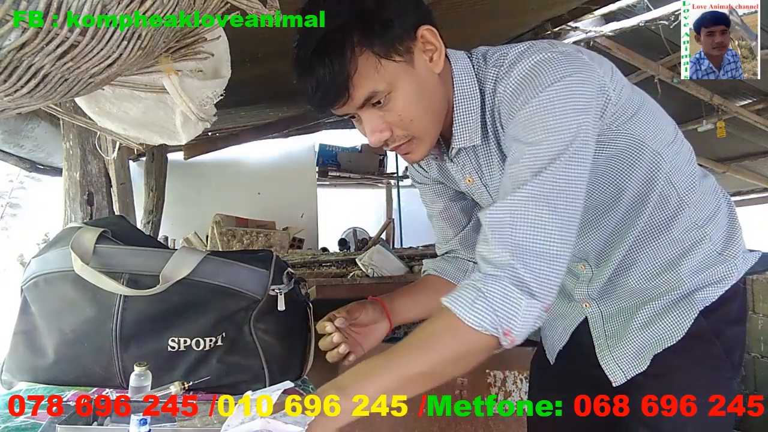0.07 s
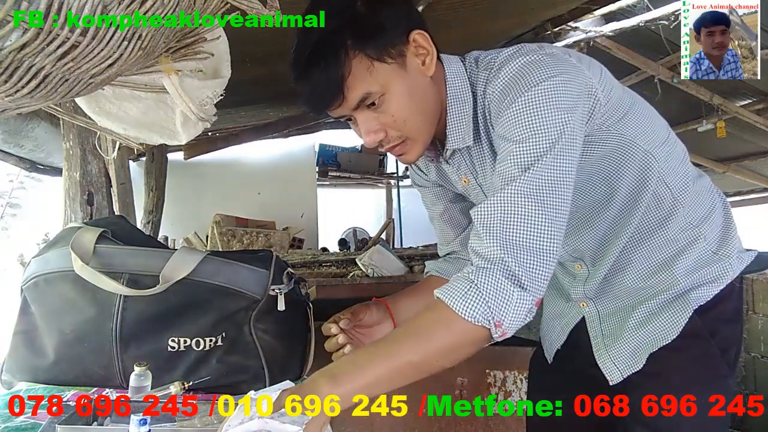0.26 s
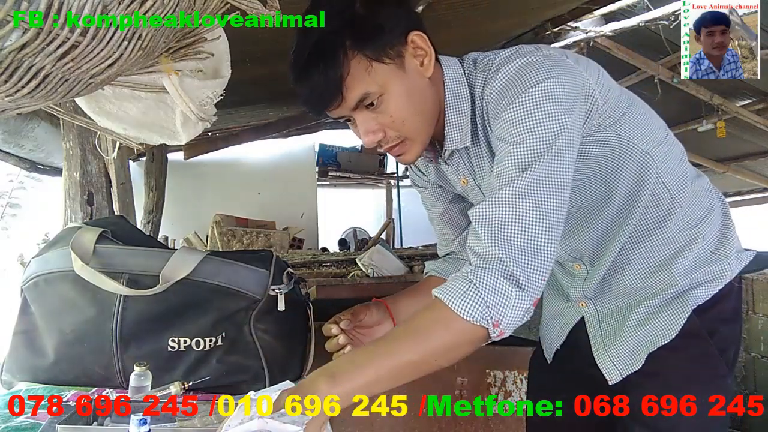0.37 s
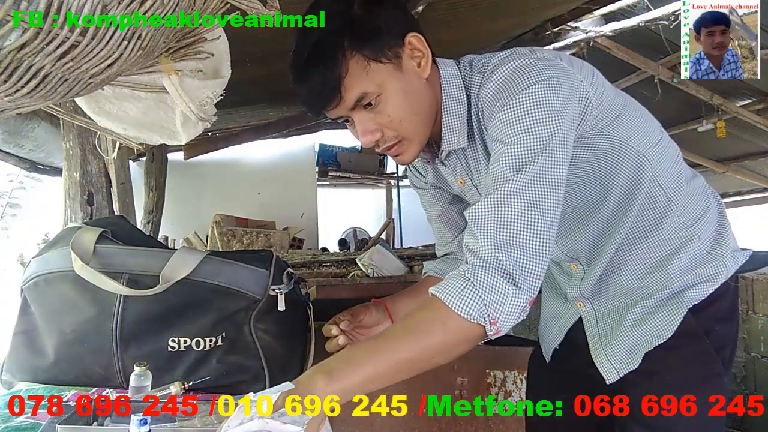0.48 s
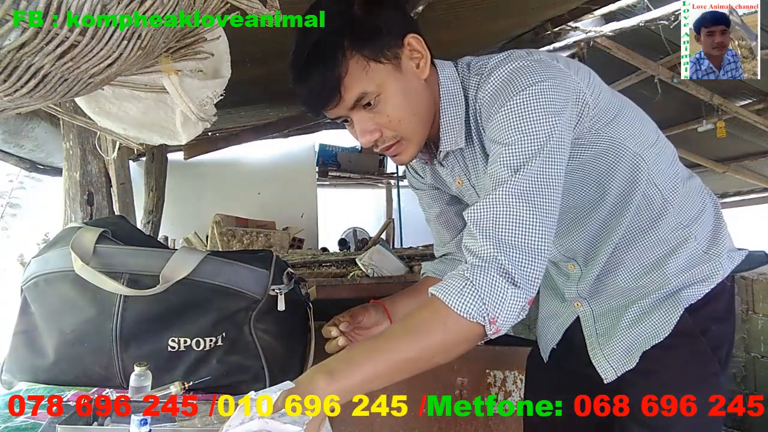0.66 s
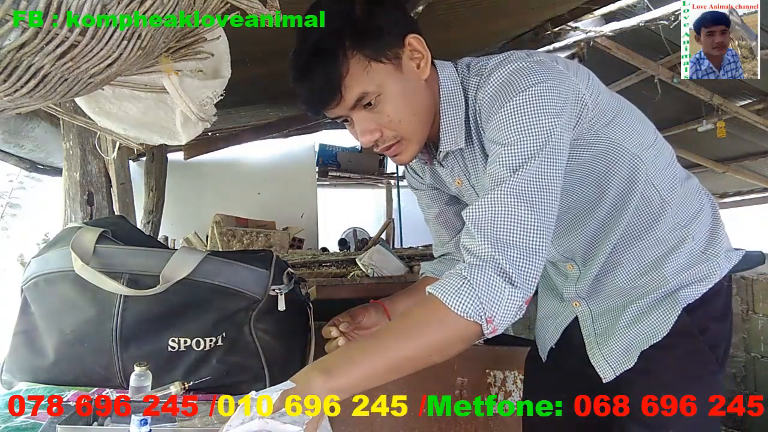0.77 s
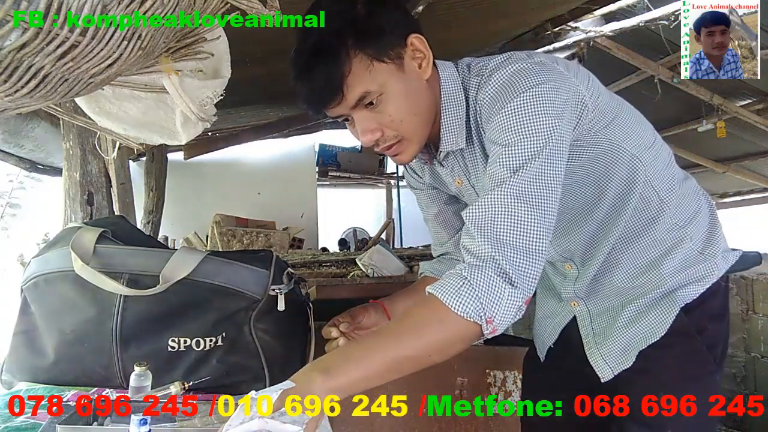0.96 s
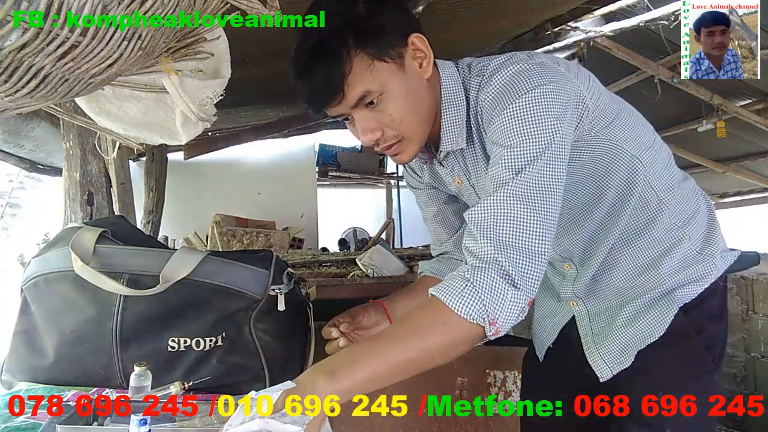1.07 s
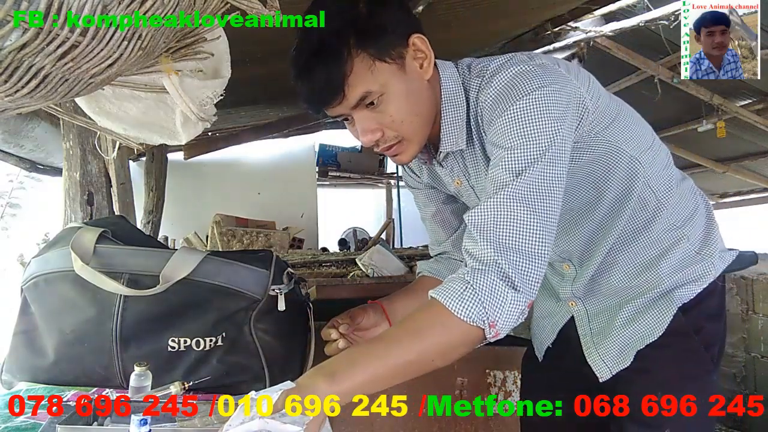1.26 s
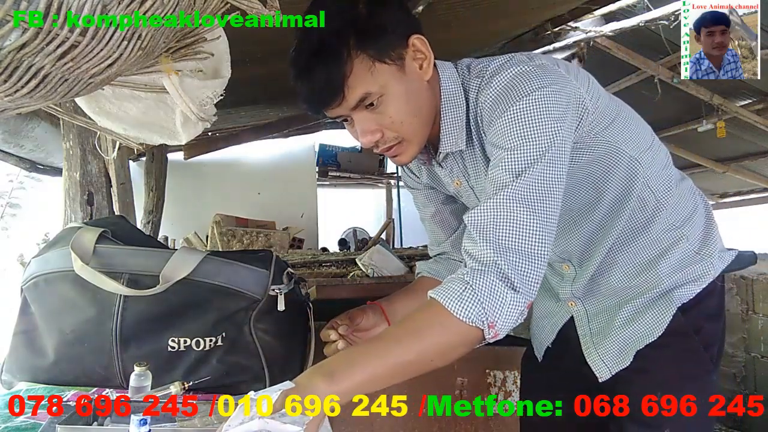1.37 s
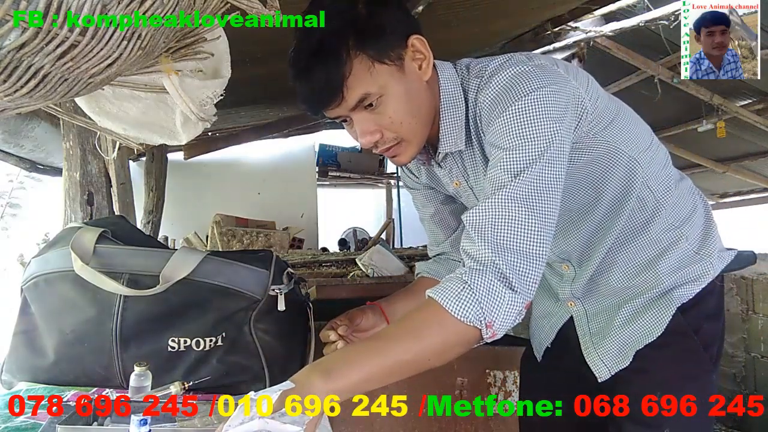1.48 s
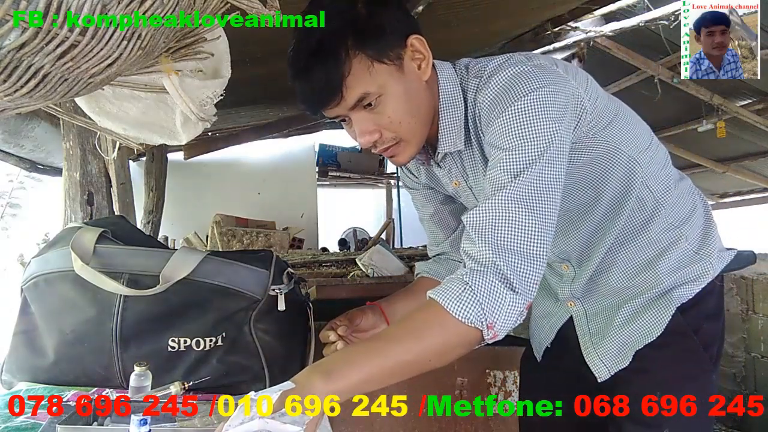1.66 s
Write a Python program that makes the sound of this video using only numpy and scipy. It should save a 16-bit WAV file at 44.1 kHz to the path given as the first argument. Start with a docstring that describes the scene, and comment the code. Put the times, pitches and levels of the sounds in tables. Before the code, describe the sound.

A pig close to the microphone creaks a slow grunt of separate throaty pops from about 0.15 to 0.4 seconds. From 0.45 to 1.5 another pig, further off, cries hoarsely in breathy, fluttering mid-pitched bursts, weaker midway and stronger again near 1.4. Small birds whistle and twitter throughout, with thin faint hisses near 1.05 and 1.35. A faint engine hum and yard air lie underneath, with short shed reverberation.

```python
"""A distant engine throbs under a far flock's twitter and faint wide yard air, in and around a pig shed.
Small birds chirp under the roof: short gliding whistles, slightly fuzzy; a few faint moans come from far off.
Close by, a pig creaks a slow grunt: flaps of the folds ring chest and mouth with puffs of air.
Another pig further off cries hoarsely again and again: a jittery, fluttering voice with rasp and breath.
Late on come two thin treble hisses; the shed answers the near and far pigs, birds and hisses."""
import sys
import numpy as np
from scipy import signal
from scipy.fft import rfft, irfft
from scipy.io import wavfile
from scipy.ndimage import uniform_filter1d

SR = 44100
rng = np.random.default_rng(int(sys.argv[2]) if len(sys.argv) > 2 else 0)


def master_out(mix):
    """Clip the mix to full scale and print it as 16-bit PCM to the path in sys.argv[1]."""
    frames = np.transpose(np.atleast_2d(mix))
    ceiling = np.clip(frames, -1, 1)
    pcm = np.round(ceiling * 32767).astype(np.int16)
    wavfile.write(sys.argv[1], SR, pcm)


def attenuation_scalar(level_db):
    """Turn a level in dB into a linear amplitude multiplier (20 dB per decade)."""
    decades = np.asarray(level_db, float) / 20
    return 10 ** decades


N = 77175
T = np.arange(N) / SR

# likeness of the left and right noise in the open air and in the shed's tail: hz, likeness (0-1)
LEFT_RIGHT_LIKENESS = [(60, 0.85), (300, 0.82), (1000, 0.12), (15000, 0.032)]


def evened(x):
    """Scales a sound to an rms of 1."""
    return x / np.sqrt(np.mean(x ** 2) + 1e-20)


def read(points, hz):
    """Reads a (Hz, value) curve along a logarithmic frequency axis."""
    f, value = np.transpose(points)
    return np.interp(np.log(hz + 1), np.log(f + 1), value)


def add(mix, start_s, sound):
    """Lays a sound into the mix at its start time, cut off at the end of the mix."""
    part = mix[..., round(start_s * SR):][..., :sound.shape[-1]]
    part += sound[..., :part.shape[-1]]


def coloured(x, spectrum):
    """Weights the spectrum by a (Hz, dB) curve."""
    weight = attenuation_scalar(read(spectrum, np.fft.rfftfreq(x.shape[-1], 1 / SR)))
    return irfft(rfft(x) * weight, x.shape[-1])


def slow(size):
    """Random drift of rms 1: noise averaged twice over size samples."""
    return evened(uniform_filter1d(uniform_filter1d(rng.standard_normal(N), size), size))


def resonate(x, hz, width_hz):
    """Shifts the curve hz down to zero, smooths, and shifts back: a resonance of gain 1."""
    turn = np.exp(2j * np.pi * np.cumsum(hz * np.ones(len(x))) / SR)
    r = np.exp(-np.pi * width_hz / SR)
    return 2 * (turn * signal.lfilter([1 - r], [1, -r], x / turn + 1e-18)).real


def narrow_band(noise, hz, width_hz):
    """Noise passed twice through one resonance, evened; the width is that of each pass."""
    return evened(resonate(resonate(noise, hz, width_hz), hz, width_hz))


def rung(noise, bands):
    """One noise ringing several resonances: hz, width_hz, level_db."""
    return sum(attenuation_scalar(db) * narrow_band(noise, hz, width_hz) for hz, width_hz, db in bands)


def likened(a, b, hz):
    """Mixes b with a so that the two channels are as alike as the table says at each frequency."""
    same = np.clip(read(LEFT_RIGHT_LIKENESS, hz), 0, 1).reshape(-1, *[1] * (a.ndim - 1))
    return same * a + np.sqrt(1 - same ** 2) * b


def placed(x, left_lag, wet_db):
    """Direct sound, its left port lagging by samples; the shed answers with sparse taps dying by band."""
    # time for the shed's tail to fall 60 dB: hz, t60_s
    shed_decay = [(100, 0.62), (600, 0.35), (2000, 0.3), (6000, 0.36), (14000, 0.032)]
    taps = np.zeros((2, SR // 2))
    tap_count = (SR // 2 - 201) // 20
    at = np.arange(200, SR // 2 - 20, 20) + rng.integers(0, 20, (2, tap_count))
    np.put_along_axis(taps, at, rng.choice([-1., 1.], at.shape), 1)
    hz, t, z = signal.stft(taps, SR, nperseg=512)
    z[1] = likened(z[0], z[1], hz)
    decay = attenuation_scalar(-60 * t / read(shed_decay, hz)[:, None])
    tail = signal.istft(z * decay, SR, nperseg=512)[1]
    x = x * np.ones((2, 1))
    wet = signal.fftconvolve(x.mean(0)[None], tail / np.linalg.norm(tail[0]), axes=1)[:, :N]
    return np.array([np.roll(x[0], left_lag), x[1]]) + attenuation_scalar(wet_db) * wet


def engine():
    """Low orders of the firing rate, each wavering a little in level."""
    # orders of the firing rate: order, level_db, phase_rad
    orders = [(3, -73, 0.1), (4, -63.5, 0.043), (5, -54, 0.089), (6, -60, 0.042), (7, -64, 0.24),
              (9, -79, 0.1), (10, -73.5, 0.045)]
    firing_hz, firing_s, wobble_db = 18.2, 0.0067, 1.0
    turn = 2 * np.pi * firing_hz * (T - firing_s)
    return sum(attenuation_scalar(db + wobble_db * slow(size=2500)) * np.cos(order * turn + phase)
               for order, db, phase in orders)


def flock():
    """Far twittering smeared into narrow flickering bands, drawn separately for left and right."""
    # loudness of the far flock: time_s, level_db
    twitter_level = [(0, -61), (.03, -61.5), (.05, -57), (.12, -64.5), (.2, -57), (.4, -59.5), (1.0, -58.5),
                     (1.3, -93), (1.4, -77), (1.6, -95), (1.65, -61.5), (1.75, -87)]
    # where the twitter gathers: hz, width_hz, level_db
    twitter_bands = [(3100, 290, -6), (4200, 200, -11.5), (5800, 760, -19)]

    def one_side():
        return sum(attenuation_scalar(db + 2 * slow(size=300)) * narrow_band(rng.standard_normal(N), hz, width_hz)
                   for hz, width_hz, db in twitter_bands)

    return attenuation_scalar(np.interp(T, *np.transpose(twitter_level))) * np.array([one_side(), one_side()])


def air():
    """Faint wide noise of the yard, its level drifting slightly."""
    # colour of the yard air: hz, level_db
    air_colour = [(15, -22), (25, -8.5), (98, -10.5), (220, -16.5), (340, -30), (787, -37), (899, -44),
                  (2480, -53), (4470, -33), (5250, -42), (14900, -55.5)]
    level_db = -58
    left, right = rfft(rng.standard_normal((2, N)))
    right = likened(left, right, np.fft.rfftfreq(N, 1 / SR))
    return attenuation_scalar(level_db + slow(size=1500)) * evened(coloured(irfft([left, right], N), air_colour))


def birds():
    """Short gliding whistles, slightly fuzzy and smeared with breath, each from its own perch."""
    # one whistle per row: start_s, length_s, from_hz, to_hz, bend_hz, level_db, left_minus_right_db
    chirps = [(.042, 0.03, 3785, 3955, 86, -56.5, -12), (0.044, 0.015, 4220, 4300, 96, -62, -3.5),
              (0.061, 0.015, 4135, 4170, -2, -59, 4), (0.078, 0.017, 4150, 4300, 70, -58, -5),
              (0.181, 0.013, 3900, 4600, 181, -51, 4), (0.214, 0.023, 4200, 3490, 4, -44, 1),
              (0.259, 0.039, 3726, 4580, -33, -48, 5), (0.192, 0.026, 5100, 5710, 189, -51, 14),
              (0.619, 0.027, 4000, 5800, -29, -51, 15.5), (0.685, 0.038, 3600, 4420, -3, -48, 0),
              (0.734, 0.018, 5400, 4840, 2, -52, 18), (0.741, 0.0092, 6500, 6200, -1, -46, 18),
              (0.818, 0.023, 5200, 6200, 384, -46, 20.5), (0.871, 0.025, 6100, 6040, 91, -67, -2),
              (0.893, 0.036, 4600, 5530, 491, -48.5, 23), (0.999, 0.031, 3600, 2448, 5, -58.5, -3.5),
              (1.169, 0.054, 4144, 2917, 897.5, -49, 5.5), (1.228, .05, 3900, 2280, 131.5, -50.5, -6.5),
              (1.641, 0.013, 4050, 5060, -21, -53, 19.5), (1.646, 0.033, 5370, 5376, 119, -58.5, 20.5),
              (1.67, 0.012, 3554, 3235, -6, -49.5, 3), (1.716, 0.024, 3100, 4406, -13, -48.5, 3)]
    fuzz_hz, overtone_db = 149.4, -21.5
    blur_share, blur_width_hz = 0.24, 680  # breathy smear round each whistle
    out = np.zeros((2, N))
    for start_s, length_s, from_hz, to_hz, bend_hz, db, pan_db in chirps:
        u = np.arange(0, 1, 1 / (length_s * SR))
        hz = from_hz + (to_hz - from_hz) * u + bend_hz * np.sin(np.pi * u)
        wander = evened(uniform_filter1d(rng.standard_normal(4000), size=60))
        hz = hz + fuzz_hz * wander[:len(u)]
        angle = 2 * np.pi * np.cumsum(hz) / SR
        blur = narrow_band(rng.standard_normal(4000)[:len(u)], hz, blur_width_hz)
        whistle = np.sin(angle) + blur_share * blur + attenuation_scalar(overtone_db) * np.sin(2 * angle)
        swell = np.sin(np.pi * u) ** .5
        add(out, start_s, whistle * swell * attenuation_scalar(db + np.array([[pan_db], [-pan_db]]) / 2))
    return out


def moans():
    """Faint short tones from far off, each swelling and fading once."""
    # one tone per row: start_s, length_s, pitch_hz, level_db
    far_tones = [(.045, 0.019, 815, -63.5), (0.1, 0.048, 811, -62.5), (0.101, 0.025, 606, -60.5)]
    out = np.zeros(N)
    for start_s, length_s, hz, db in far_tones:
        t = np.arange(0, length_s, 1 / SR)
        add(out, start_s, attenuation_scalar(db) * np.sin(np.pi * t / length_s) * np.sin(2 * np.pi * hz * t))
    return out


def creak():
    """Each flap snaps bright, rings mouth and chest with a puff of air; the bright part takes several paths."""
    # one flap of the folds per row: start_s, level_db, bright_db (lifts the snap, lowers the chest)
    flaps = [(0.15, -42, -4), (0.1838, -24, 7), (0.2216, -17.5, 8.5), (0.259, -17, 10.5),
             (0.2946, -18.5, 6), (0.3317, -23, 0.5), (0.368, -29, 3.5)]
    # decaying modes of the chest, the mouth and the quick bright edge: hz, level_db, t60_s
    chest_modes = [(91.8, 1.5, 0.04), (135, -1.5, 0.04), (192, -2.5, 0.035), (250, -7, 0.03)]
    mouth_modes = [(440, -19, 0.025), (594, -1.5, 0.028), (1095, -1, 0.025), (1480, -15, 0.0098)]
    edge_modes = [(1930, 8.5, 0.011), (2480, -4.5, 0.021), (3100, 3, 0.0076), (3620, -4, 0.021),
                  (4300, -19, 0.0051), (5600, -23, 0.005)]
    # colour of the air puff: hz, level_db
    puff_colour = [(300, 0.5), (1200, -1.5), (2000, 7), (3600, -3.5), (5000, -8.5), (7500, -13.5),
                   (14000, -30.5)]
    # ways from the near pig to the microphone: delay_s, level_db, extra_left_delay_s
    paths = [(0, -9, -0.0035), (.0022, 1, 0.0011), (.0066, -11.5, 0.0044), (.0087, -16, 0.024),
             (0.0107, -11.5, 0.0095), (.022, -25.5, -0.04)]
    chest_db, mouth_db, edge_db, puff_db, puff_t60_s = -7, -10.5, -23.5, -18.5, 0.021
    chest_rise_s, mouth_rise_s, edge_rise_s = 0.0028, 0.00062, 0.00037
    mouth_late_s, mouth_left_late_s = 0.001843, 0.00019
    detune = .03  # each mode strays up to this share of its pitch
    t, out = np.arange(5000) / SR, np.zeros((2, N))

    def ring(modes):
        total = 0
        for hz, db, t60_s in modes:
            strayed_hz = hz * rng.uniform(1 - detune, 1 + detune)
            total = total - attenuation_scalar(db - 60 * t / t60_s) * np.sin(2 * np.pi * strayed_hz * t)
        return total

    def rise(length_s):
        return np.minimum(t / length_s, 1)

    def puff():
        hiss = evened(coloured(rng.standard_normal(len(t)), puff_colour))
        return hiss * attenuation_scalar(puff_db - 60 * t / puff_t60_s)

    for start_s, db, bright_db in flaps:
        chest = attenuation_scalar(chest_db - bright_db) * ring(chest_modes) * rise(chest_rise_s) ** 2
        mouth = attenuation_scalar(mouth_db) * ring(mouth_modes) * rise(mouth_rise_s)
        add(out[0], start_s + mouth_late_s + mouth_left_late_s, attenuation_scalar(db) * mouth)
        add(out[1], start_s + mouth_late_s, attenuation_scalar(db) * mouth)
        add(out, start_s, attenuation_scalar(db) * chest[None])
        for late_s, path_db, left_late_s in paths:
            edge = (attenuation_scalar(edge_db) * ring(edge_modes) + puff()) * rise(edge_rise_s)
            edge = attenuation_scalar(db + bright_db + path_db) * edge
            add(out[0], start_s + late_s + left_late_s, edge)
            add(out[1], start_s + late_s, edge)
    return out


def grunts():
    """A jittery voice fluttered by a slow second vibration, with rasp around each partial and breath hiss."""
    # course of the cries: time_s, level_db, second_partial_db, third_partial_db, upper_partials_db,
    # breath_db, flutter_hz, roughness (0-1)
    cries = [(0.418, -65.5, 10, -3, 10, -3.5, 65, 0.56), (0.461, -32.5, -20.5, -10.5, -38, -16, 58.4, 0),
             (0.477, -35, -9, -16, -17, -11.5, 65, 0.03),
             (0.495, -29.5, -13.5, -11.5, -47, -18.5, 68.3, 0.24),
             (0.537, -34.5, -2.5, -8.5, -44, -14, 66.1, 0.39), (0.574, -40, -6.5, -11, -32, -18.5, 65, 0.2),
             (0.625, -48, 0.5, -7.5, -10, -7.5, 61.8, 0.5), (0.667, -35.5, -3.5, -9, -37, -15.5, 65, 0.22),
             (0.728, -36, -6.5, -13, -27, -12.5, 71.8, 0.37),
             (0.743, -47.5, 7.5, -3.5, -10, -2, 67.25, 0.09),
             (0.858, -40.5, -15.5, -27.5, -20, -8.5, 63.3, 0.05),
             (0.891, -50.5, -18, -2.5, -8, -1, 66.4, 0.08), (0.905, -40, -6.5, -33, -20, -10.5, 64.4, 0),
             (1.004, -56.5, -2, -24, -27, -10.5, 65, 0.56), (1.058, -40.5, -11, -57, -32, -24, 65, 0.49),
             (1.164, -43.5, 1, -49, -32, -24.5, 67.4, 0.04), (1.199, -54.5, -18, -19, -57, -11, 64.6, 0.55),
             (1.252, -50.5, -13.5, -38, -45, -31, 67.6, 0.56), (1.308, -53.5, -9, -49, -48, -51, 63.7, 0.5),
             (1.348, -39.5, -11.5, -40, -44, -24, 66, 0.26), (1.384, -44.5, -2.5, -6, -23, -23, 62, 0),
             (1.403, -31.5, -16, -49, -49, -43, 64.6, 0.33), (1.432, -37.5, -5, -37, -55, -36, 62.3, 0.2),
             (1.505, -63.5, 9.5, -28, -29, -2, 78, 0.53), (1.527, -49.5, -30, -26, -52, -34, 65, 0.42),
             (1.62, -75, 21.5, -20, -48, -35, 67, 0.21)]
    # pitch of the voice: time_s, pitch_hz
    pitch = [(.43, 530), (.46, 600), (.485, 660), (.54, 665), (.56, 705), (.6, 715), (.625, 510),
             (.66, 570), (.7, 625), (.745, 560), (.785, 450), (.83, 540), (.865, 590), (.9, 540),
             (.94, 480), (1.02, 430), (1.07, 510), (1.11, 565), (1.15, 540), (1.19, 500), (1.23, 470),
             (1.31, 450), (1.34, 470), (1.36, 540), (1.385, 620), (1.45, 598), (1.48, 570), (1.6, 560)]
    # upper partials: partial, level_db
    upper_partials = [(4, 13), (5, 4), (6, -2.5)]
    # colours of the broad rasp and of the breath: hz, level_db
    rasp_colour = [(250, -13.5), (450, -17), (1400, 2.5), (1750, 5.5), (1950, -8), (4000, -27), (6000, -27)]
    breath_colour = [(1710, -33), (2900, -4), (3300, 7.5), (4250, 5), (5670, 12.5), (8320, 3),
                     (13500, -1.5), (14600, -44), (14900, -32.5)]
    # throat and open-mouth resonances rung by the rasp: hz, width_hz, level_db
    throat_bands = [(1060, 140, 5), (820, 150, -3)]
    mouth_bands = [(1553, 293, 7.5), (2080, 420, -9), (2460, 220, -6)]
    jitter, flutter_jitter, flutter_depth, shimmer_db = 0.011, 0.089, 0.57, 1.5
    rasp_width_hz, rough_per_partial = 166, 0.14  # the width grows with the partial's number
    octave_db, throat_db, mouth_rasp_db, rasp_floor_db = -2, -0.5, -3, -12.5

    s, *columns = np.transpose(cries)
    db, second_db, third_db, upper_db, breath_db, rate_hz, rough = (np.interp(T, s, c) for c in columns)
    hz, rough = np.interp(T, *np.transpose(pitch)), np.clip(rough, 0, 1)
    turns = np.cumsum(rate_hz * (1 + flutter_jitter * slow(size=300))) / SR
    flutter = 1 + flutter_depth * np.cos(2 * np.pi * turns)
    flutter = evened(flutter * attenuation_scalar(shimmer_db * slow(size=200)))
    angle = 2 * np.pi * np.cumsum(hz * (1 + jitter * slow(size=120))) / SR
    noise = rng.standard_normal(N)

    def partial(k):
        width_hz = rasp_width_hz * k
        rasp = evened(resonate(resonate(noise, k * hz, width_hz), k * hz, 2 * width_hz))
        rasp_share = np.clip(rough + rough_per_partial * (k - 1), 0, .95)
        return np.sqrt(2 * (1 - rasp_share)) * np.sin(k * angle) + np.sqrt(rasp_share) * rasp

    throat = evened(rung(noise, throat_bands))
    mouth = evened(rung(noise, mouth_bands))
    second = attenuation_scalar(octave_db) * partial(2) + attenuation_scalar(throat_db) * throat
    third = partial(3) + attenuation_scalar(mouth_rasp_db) * mouth
    upper = evened(sum(attenuation_scalar(d) * partial(k) for k, d in upper_partials))
    voice = partial(0.99)  # the fundamental lies a touch under the pitch curve
    voice = voice + attenuation_scalar(second_db) * second + attenuation_scalar(third_db) * third + attenuation_scalar(upper_db) * upper
    voice = voice + attenuation_scalar(rasp_floor_db) * evened(coloured(noise, rasp_colour))
    # one shared noise plus one for each side
    breath = rng.standard_normal(N) + rng.standard_normal((2, N))
    breath = evened(coloured(breath, breath_colour)) * (0.53 + 0.41 * flutter)
    inside = np.clip(np.minimum(T - s[0], s[-1] - T) / 0.0049, 0, 1)  # fades in and out, s
    return inside * attenuation_scalar(db) * (flutter * voice + attenuation_scalar(breath_db) * breath)


def hisses():
    """Short thin hisses: one noise in narrow treble bands, rising quickly and falling away."""
    # one hiss per row: start_s, length_s, level_db
    hiss_times = [(1.048, 0.12, -70), (1.331, 0.14, -60)]
    # treble bands of the hiss: hz, width_hz, level_db
    hiss_bands = [(8410, 331, 3), (6370, 260, 2.5), (4560, 200, -10)]
    rise_s = 0.027
    level = sum(attenuation_scalar(db) * np.interp(T, [s, s + rise_s, s + length_s], [0, 1, 0])
                for s, length_s, db in hiss_times)
    return rung(rng.standard_normal(N), hiss_bands) * level


def scene():
    """Sets the pigs, birds and hisses in the shed, with flock, engine and air heard directly."""
    # early wall echoes of the far pig: delay_s, left_db, right_db
    wall_echoes = [(.0031, -10, -24), (.0057, -27, -10.5), (.0113, -11.5, -19), (.017, -22, -11)]
    far_pig = (grunts() + moans()) * attenuation_scalar([[.5], [-.5]])  # slightly to the left, dB
    echoes = sum(attenuation_scalar([[left_db], [right_db]]) * np.roll(far_pig, round(delay_s * SR), axis=1)
                 for delay_s, left_db, right_db in wall_echoes)
    under_roof = placed(birds() + hisses(), left_lag=0, wet_db=-5)
    near_pig = placed(creak(), left_lag=0, wet_db=-6.5)
    # a negative lag: the far pig's direct sound reaches the left port first
    far_pig = placed(far_pig, left_lag=-13, wet_db=-3)
    return near_pig + far_pig + echoes + under_roof + flock() + engine() + air()


def low_pass(x):
    """Removes everything above the highest recorded frequency."""
    return signal.sosfilt(signal.butter(12, 15040, fs=SR, output="sos"), x)


def record(dry):
    """The microphone cuts the lowest bass."""
    low_cut_hz = 69
    cut = signal.sosfilt(signal.butter(3, low_cut_hz, "high", fs=SR, output="sos"), dry)
    return low_pass(cut)


dry = scene()
out = record(dry)
master_out(out)
```